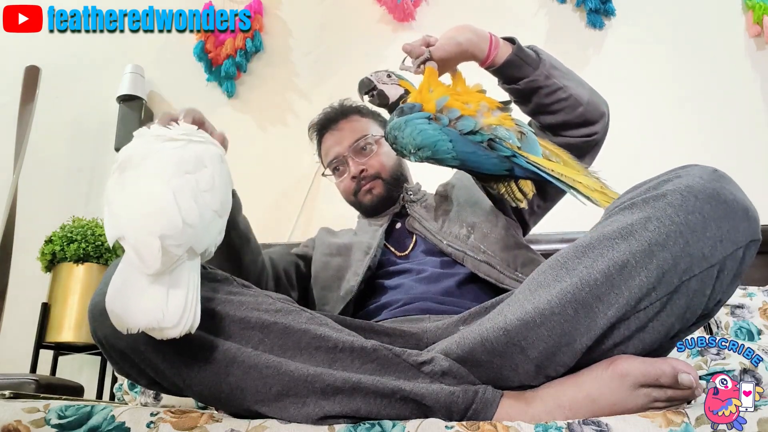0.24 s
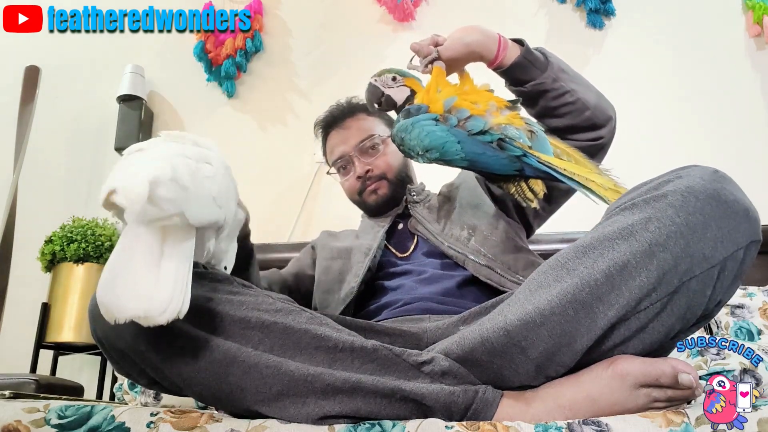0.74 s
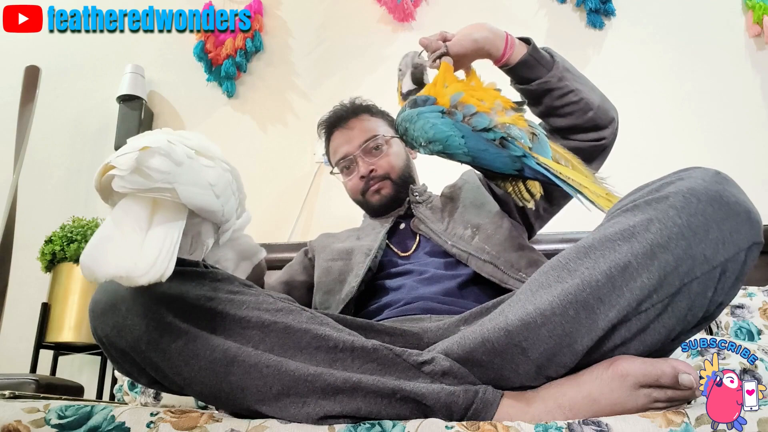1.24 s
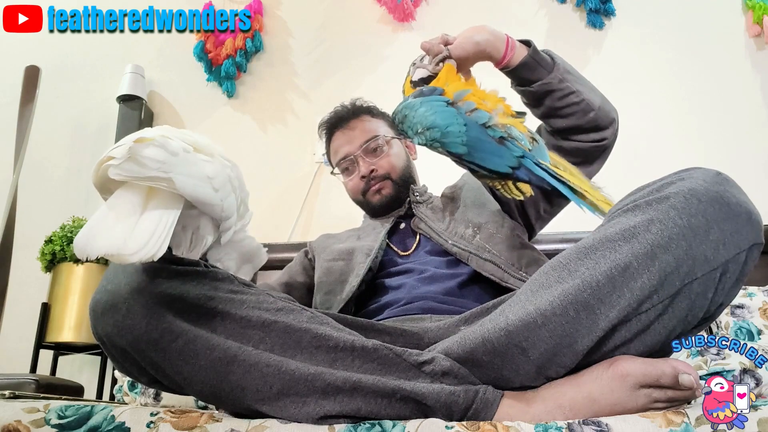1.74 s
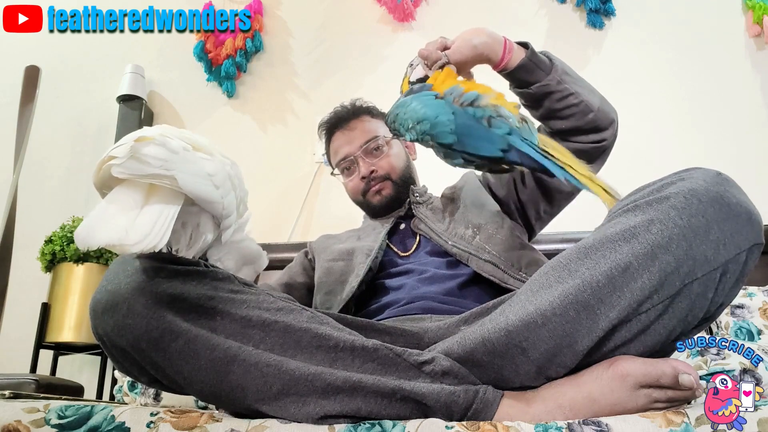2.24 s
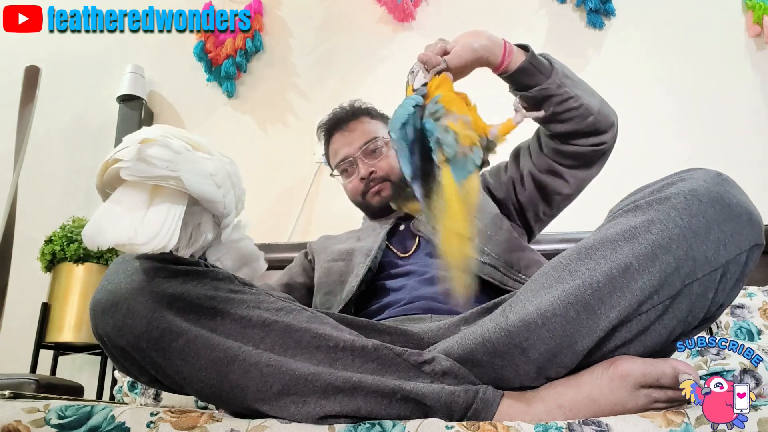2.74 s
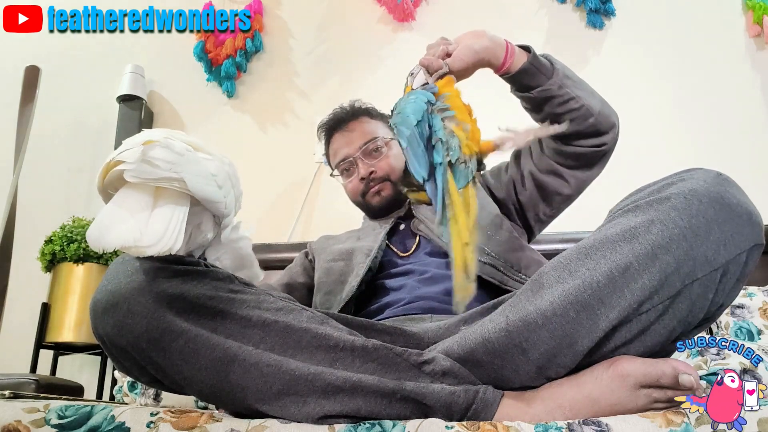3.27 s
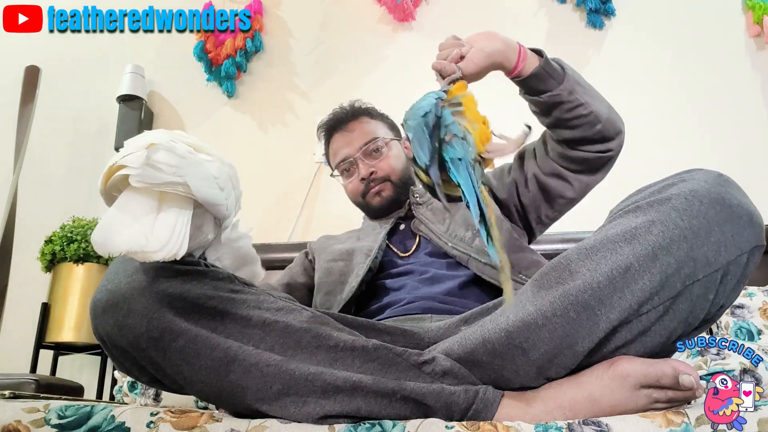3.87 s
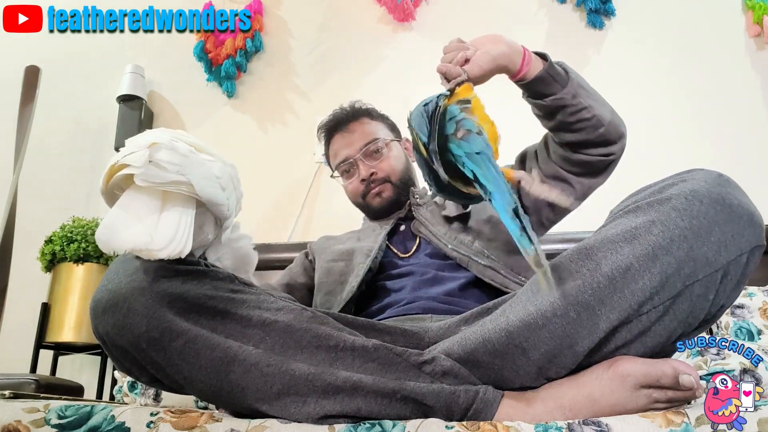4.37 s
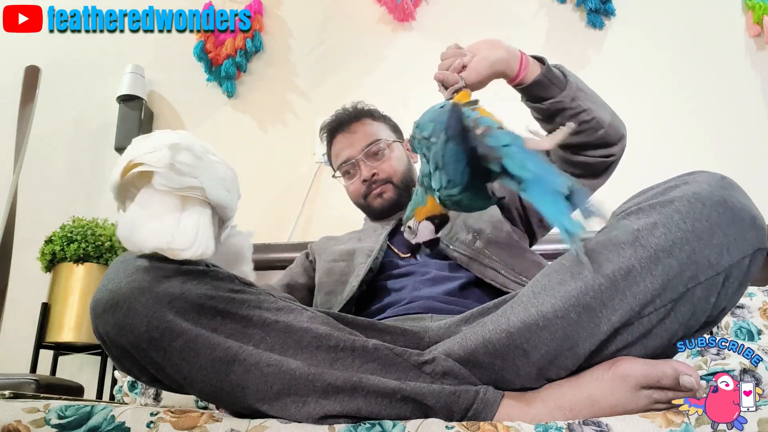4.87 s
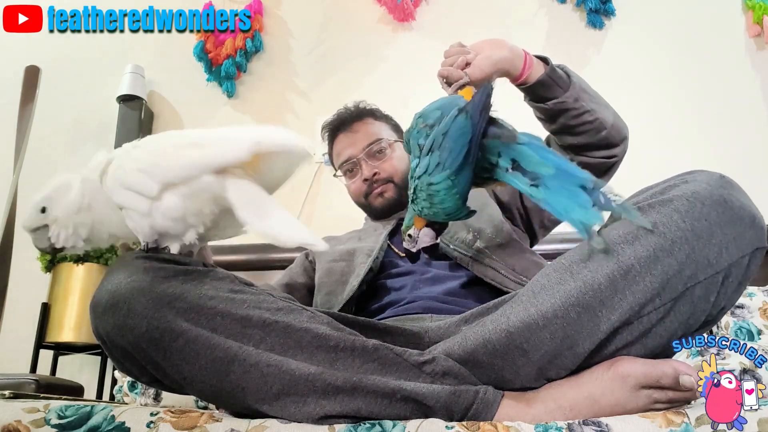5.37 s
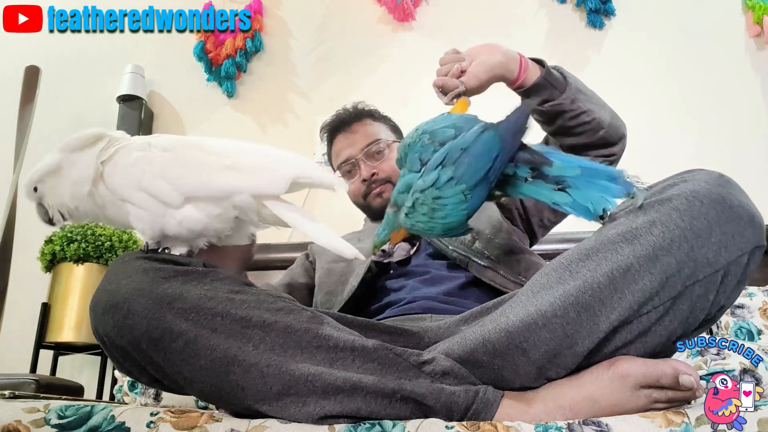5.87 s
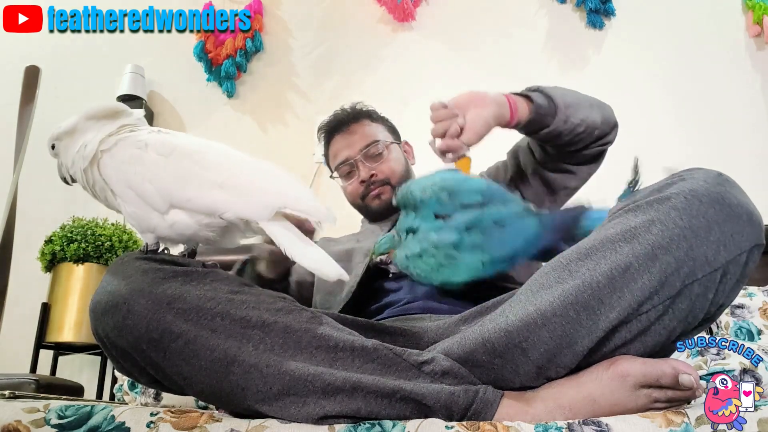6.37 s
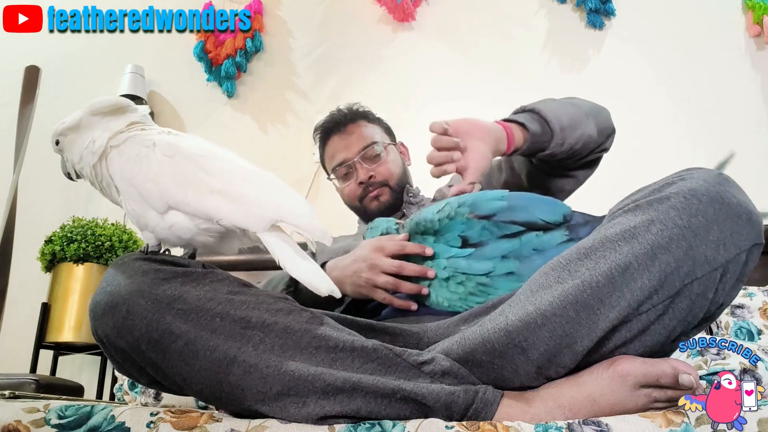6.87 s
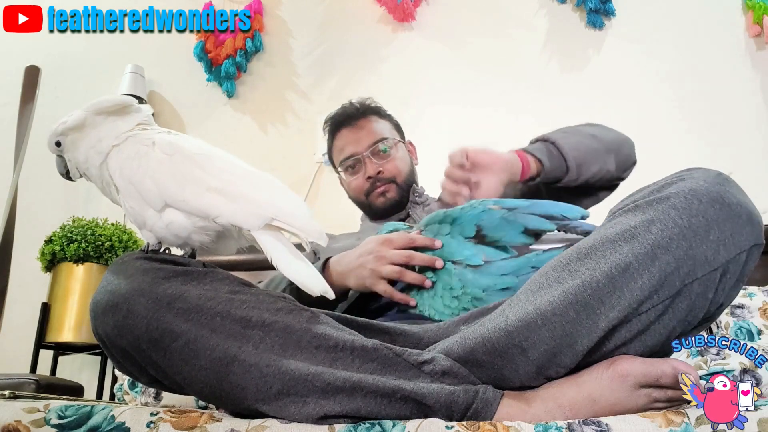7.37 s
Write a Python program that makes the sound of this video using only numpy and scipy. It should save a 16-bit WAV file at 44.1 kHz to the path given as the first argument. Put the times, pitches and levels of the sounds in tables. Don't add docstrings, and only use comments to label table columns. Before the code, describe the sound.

Pet parrots in an echoing bedroom give scattered squeaks, screeches and low growls, then one loud rising scream, and later three quick hoarse barks.

```python
import sys
import numpy as np
from scipy import signal
from scipy.fft import rfft, irfft, next_fast_len
from scipy.io import wavfile
from scipy.ndimage import uniform_filter1d, minimum_filter1d

SR = 44100
rng = np.random.default_rng(int(sys.argv[2]) if len(sys.argv) > 2 else 0)


def invert_db(x):
    u = np.asarray(x, float) / 20
    return 10 ** u


def output_pcm(signal):
    pcm = np.clip(np.atleast_2d(signal).T, -1, 1) * 32767
    wavfile.write(sys.argv[1], SR, np.round(pcm).astype(np.int16))


N = 335601

# start in seconds, length in seconds, pitch in Hz, level in dB.
WHISTLES = [(0.0, 0.18, 4625, -37.5), (.655, 0.043, 3706, -37.5), (1.114, 0.033, 3760, -50),
            (1.26, 0.18, 2995, -49), (1.555, 0.051, 3298, -31), (2.44, 0.091, 3540, -30),
            (2.5, 0.12, 3333, -32), (3.4, 0.065, 3560, -36), (3.62, .13, 3580, -38),
            (4.52, 0.079, 2479, -10.5), (5.44, 0.066, 1664, -58), (5.45, 0.042, 3400, -48),
            (6.64, 0.21, 5820, -40.5), (7.15, 0.039, 2610, -48.5), (7.21, 0.11, 3094, -48)]
# start in seconds, length in seconds, pitch in Hz, level in dB.
PEEPS = [(.178, 0.036, 2838, -29.5), (.48, 0.19, 1634, -54), (.535, 0.074, 1883, -48.5),
         (1.096, 0.031, 4384, -44.5), (2.228, 0.3, 2603, -42), (2.335, 0.041, 3066, -37),
         (2.753, 0.035, 1605, -38), (4.372, 0.067, 1672, -23), (5.305, 0.15, 8900, -41),
         (6.5, 0.12, 3180, -52.5), (6.575, .1, 2867, -33), (7.245, 0.071, 1674, -40.5)]
# start in seconds, length in seconds, pitch in Hz, level in dB.
SCREECHES = [(.19, 0.068, 3894, -33.5), (.832, 0.046, 3374, -42), (1.325, .14, 3274, -37),
             (1.44, 0.29, 3770, -40.5), (1.46, 0.065, 2838, -34), (1.584, .14, 2550, -35),
             (1.72, 0.061, 2442, -27), (1.865, 0.072, 2496, -25.5), (1.865, 0.049, 4280, -31.5),
             (1.96, 0.057, 2627, -30), (2.04, 0.046, 3203, -28.5), (2.15, 0.091, 1704, -42.5),
             (2.571, 0.066, 2788, -37.5), (3.325, 0.099, 2357, -35), (3.552, 0.083, 2590, -24),
             (3.92, 0.096, 2540, -28.5), (3.945, 0.085, 2842, -25), (4.09, 0.15, 2623, -26.5),
             (5.309, 0.055, 4550, -41), (5.39, .07, 4420, -46), (6.052, 0.037, 7600, -38),
             (5.4, 0.086, 6580, -48), (6.565, 0.047, 2570, -36), (6.64, .13, 4150, -35.5)]
# start in seconds, length in seconds, pitch in Hz, level in dB.
RASPS = [(0.0, 0.012, 2790, -16), (.066, 0.032, 4206, -28), (.07, 0.058, 3014, -35),
         (.18, 0.055, 3050, -41), (.625, 0.066, 4255, -43), (1.692, 0.048, 3030, -25),
         (1.74, .25, 1093, -47), (2.15, 0.014, 8200, -18.5), (2.85, 0.048, 7100, -58),
         (3.115, 0.048, 3810, -61.5), (4.0, .27, 1103, -47), (5.9, 0.021, 7650, -42.5),
         (4.2, 0.2, 2313, -32), (5.335, 0.11, 2350, -43), (6.555, 0.082, 7410, -36.5),
         (6.62, .06, 1227, -27.5), (6.95, 0.028, 7210, -26.5), (7.56, 0.054, 3460, -60)]
# start in seconds, length in seconds, pitch in Hz, level in dB.
WHEEZES = [
    (.66, 0.068, 2210, -53),
    (1.14, 0.069, 2674, -53),
    (1.185, 0.067, 1833, -53),
    (2.6, 0.084, 5260, -46),
    (3.552, .071, 4950, -36),
    (5.153, 0.26, 3510, -57),
    (6.37, 0.085, 3440, -51),
]
# start in seconds, length in seconds, pitch in Hz, level in dB.
HUFFS = [
    (3.18, 0.57, 1096, -57),
    (3.35, 0.16, 4147, -35),
    (3.89, .18, 4567, -32),
    (4.06, .26, 4624, -29.5),
    (5.33, .13, 4550, -46.5),
    (6.313, 0.019, 2670, -38.5),
    (1.75, 0.24, 3490, -36),
]
# start in seconds, pulses per second, level in dB, first and last resonance in Hz.
GROWLS = [
    (0.617, 51.4, -27.5, 1108, 1102),
    (0.638, 74, -41, 801, 795),
    (2.589, 65, -26.5, 759, 1076),
    (2.702, 46, -35.5, 358.2, 312),
]
# start in seconds, first and last pitch in Hz, level in dB, mouth resonance in Hz.
HONKS = [
    (2.85, 552.3, 572.5, -36.5, 1040),
    (5.872, 533, 510.4, -38, 1035),
    (6.052, 600, 527.6, -26.5, 980),
]
# start in seconds, first and last pitch in Hz, level in dB, mouth resonance in Hz.
SCREAM = [
    (4.364, 477.3, 632.4, -9.5, 2440),
]
# start in seconds, first and last pitch in Hz, level in dB, mouth resonance in Hz.
BARKS = [
    (6.621, 818.4, 704, -24, 1620),
    (6.782, 662, 584.3, -14, 1692),
    (6.953, 810, 668, -18.5, 1160),
]
# frequency in Hz, level in dB.
HONK_THROAT = [(500, 5.5), (1100, 17.5), (1650, -0.5), (2200, -9), (2700, 1.5), (3300, -7.5), (3800, -12),
               (5000, -23.5), (6000, -53), (7500, -72), (9000, 10.5), (11000, -52), (14000, -26)]
SCREAM_THROAT = [(500, -21), (1100, -7), (1450, -10), (1800, -10), (2900, -10), (3500, -11), (4500, -18.5),
                 (7500, -16), (11000, -29), (15000, -23.5)]
BARK_THROAT = [(600, -22), (1200, -3.5), (2100, -20.5), (2900, -18.5), (4000, -38.5), (5000, -45),
               (5800, -44), (7500, -32.5), (9000, -22.5), (11000, -41), (14000, -28.5)]
QUICK_DROP = [(0, 0), (.3, .7), (1, 1)]
LATE_RISE = [(0, 0.015), (.35, 0.018), (.53, .6), (.85, .92), (1, 0.81)]
# frequency in Hz, density in dB per Hz.
HUM = [(12, -23), (20, 8), (146, -12.5), (305, -1.5), (541, -9), (1160, -2.5), (1410, -11.5), (3360, -17),
       (5200, -50.5), (6000, -37.5), (6830, -46), (8270, -21.5), (9730, -58), (13500, -30)]
# time in seconds, rustle in dB.
STIR = [(0.0, -59.5), (1.3, -61.5), (1.7, -60), (2.54, -48.5), (2.79, -44.5), (2.98, -65), (3.24, -50.5),
        (3.45, -47.5), (4.09, -56), (5.19, -63.5), (6.88, -57), (7.6, -63)]
# frequency in Hz, left-right likeness from 0 to 1.
LIKENESS = [(30, 0.9), (200, 0.94), (400, 0.68), (800, 0.032), (1500, .0), (15000, 0.94)]
# from seconds, lead of the left port in samples (negative: right leads), left-
# right difference in dB.
BEARING = [
    (0, -20.5, 1),
    (.45, 20.5, 1),
    (1.0, 26, 1),
    (2.55, 23.5, 5),
    (3.3, 25, 1.5),
    (3.9, -4.5, -1.5),
    (5.1, 26, 1.5),
    (6.03, -18, 7),
    (6.3, 25, 2.5),
]
# frequency in Hz, time to fall 60 dB in seconds.
ROOM_T60 = [(300, 0.56), (1000, 0.55), (2500, 0.62), (5000, 0.56), (8000, 0.46), (13000, 0.49)]
# frequency in Hz, gain in dB.
MICROPHONE = [(50, -2.5), (4500, 2.5), (5300, -1), (6050, -8), (7300, -2.5), (8600, -4), (9600, -13.5),
              (10700, -7), (12000, -11), (12900, -3), (14500, -10.5), (16000, -25)]
# frequency in Hz, threshold in spreads of chance.
STARVED = [(5000, -3), (6500, -1.4), (9000, -.6), (12000, -.1), (15500, .2)]


def at_hz(points, hz):
    table_hz, values = np.array(points).T
    return np.interp(np.log(np.maximum(hz, 1)), np.log(table_hz), values)


def rms_one(x):
    return x / np.sqrt(np.mean(x ** 2) + 1e-20)


def band_pass(x, order, band_hz):
    return signal.sosfilt(signal.butter(order, band_hz, "band", fs=SR, output="sos"), x)


def wander(rate_hz):
    r = np.exp(-2 * np.pi * rate_hz / SR)
    return rms_one(signal.lfilter([1], [1, -2 * r, r * r], rng.standard_normal(N)))


def coloured(x, points):
    length = x.shape[-1]
    size = next_fast_len(length)
    gain = invert_db(at_hz(points, np.fft.rfftfreq(size, 1 / SR)))
    return irfft(rfft(x, size) * gain, size)[..., :length]


def diffuse(size):
    mid, side = rfft(rng.standard_normal((2, size)))
    alike = np.clip(at_hz(LIKENESS, np.fft.rfftfreq(size, 1 / SR)), -1, 1)
    ports = np.sqrt(1 + alike) * mid + np.sqrt(1 - alike) * side * [[1], [-1]]
    return irfft(ports, size) / np.sqrt(2)


def breath_span(start, length, attack, release):
    at = np.arange(round(start * SR), min(round((start + length) * SR), N))
    t = (at - at[0]) / SR
    rise = np.clip(t / attack, 0, 1)
    fall = np.clip((length - t) / release, 0, 1)
    return at, t / length, np.sin(np.pi / 2 * rise * fall) ** 2


def shrill():
    kinds = [(WHISTLES, 0.0251, -15), (PEEPS, 0.022, -3.5), (SCREECHES, 0.0487, -5.5),
             (RASPS, 0.095, -2.5), (WHEEZES, 0.0862, -15), (HUFFS, 0.2, -8.5)]
    sag_share = 0.0307
    out, flutter, throb = np.zeros(N), wander(195.5), wander(177)
    air = rng.standard_normal(N)
    stray = wander(14.05)
    air = rms_one(band_pass(air, 2, [1800, 9000]))
    notes = [(*note, scatter, step_db) for kind, scatter, step_db in kinds for note in kind]
    for k, (start, length, hz, level_db, scatter, step_db) in enumerate(notes):
        at, progress, envelope = breath_span(start, length, 0.004 + 0.12 * length, 0.016)
        own = (at + 7919 * k) % N
        unsteady = flutter[own] + 0.4 * stray[own]
        unsteady = unsteady - unsteady.mean()
        pitch = hz * (1 + scatter * unsteady + sag_share * (0.5 - progress))
        phase = 2 * np.pi * np.cumsum(pitch) / SR
        tone = sum(invert_db(step_db * (n - 1)) * np.sin(n * phase) for n in range(1, 7) if n * hz < 15500)
        hiss = invert_db(-15.5) * air[own] * np.sqrt(scatter / 0.039) * (hz < 6000)
        effort_db = level_db + 1.3 * throb[own] + 3.18 * stray[at]
        out[at] += invert_db(effort_db) * envelope * (np.sqrt(2) * tone + hiss)
    return out


def background():
    size = next_fast_len(N)
    out = invert_db(-54.5) * rms_one(coloured(diffuse(size), HUM))[:, :N]
    stir = diffuse(size)
    s, rustle_db = np.transpose(STIR)
    rumble_db = -60.5 + 0.54 * (rustle_db - rustle_db.mean())
    for level_db, band_hz in ((rustle_db, [170, 450]), (rumble_db, [35, 110])):
        low = band_pass(stir, 3, band_hz)[:, :N]
        out = out + invert_db(np.interp(np.arange(N) / SR, s, level_db)) * rms_one(low)
    return out


def growls():
    out, uneven, flutter = np.zeros(N), wander(38.2), wander(60)
    for start, per_s, level_db, first_hz, last_hz in GROWLS:
        at, progress, envelope = breath_span(start, 0.1804, 0.013, 0.12)
        slaps = np.cumsum(per_s * (1 + 0.298 * uneven[at]).clip(0.3) / SR)
        since_slap = slaps % 1 / per_s
        hz = first_hz + (last_hz - first_hz) * np.sqrt(progress)
        hz = hz * (1 + 0.086 * flutter[at])
        ring = np.sin(2 * np.pi * np.cumsum(hz) / SR)
        ring = ring * since_slap ** 2 * np.exp(-since_slap / 0.0019)
        out[at] += invert_db(level_db) * envelope * rms_one(ring)
    return out


def honks(calls, length, throat, wobble, hoarse, mouth_width, attack, glide):
    out, flutter, turbulence = np.zeros(N), wander(107), wander(120)
    orders = np.arange(1, 34)[:, None]
    loudest_db = np.max(np.transpose(calls)[3])
    for start, first_hz, last_hz, level_db, mouth_hz in calls:
        at, progress, envelope = breath_span(start, length, attack, 0.018)
        travel = np.interp(progress, *np.transpose(glide))
        pitch = (first_hz + (last_hz - first_hz) * travel) * (1 + wobble * flutter[at])
        phase = 2 * np.pi * np.cumsum(pitch) / SR
        hz = orders * pitch
        effort = 0.4 * (level_db - loudest_db)
        mouth = 1 / (1 + ((hz - mouth_hz) / (mouth_width * mouth_hz)) ** 2)
        throat_db = at_hz(throat, hz) + effort * np.log2(hz / mouth_hz).clip(0, 2)
        overtones = (invert_db(throat_db) + mouth) * np.sin(orders * phase) * (hz < 16000)
        stack = np.sum(overtones, axis=0)
        out[at] += invert_db(level_db) * envelope * rms_one(stack * (1 + hoarse * turbulence[at]))
    return out


def two_ports(x):
    s, delay, pan_db = np.transpose(BEARING)
    now = np.arange(N)
    place = np.searchsorted(s * SR, now, "right") - 1
    sides = np.array([[1], [-1]])
    arrival = now - 12 + sides * delay[place] / 2
    return np.interp(arrival, now, x) * invert_db(sides * pan_db[place] / 2)


def bedroom(x):
    size = SR
    t, field, tail = np.arange(size) / SR, diffuse(size), 0
    edges = 150 * 2 ** np.arange(0, 7.1, 0.5)
    for low, high in zip(edges, edges[1:]):
        band = band_pass(field, 2, [low, high])
        tail = tail + band * invert_db(-60 * t / at_hz(ROOM_T60, np.sqrt(low * high)))
    tail = tail * np.clip((t - 0.003) / 0.0037, 0, 1)
    tail = tail / np.sqrt(np.sum(tail ** 2) / 2)
    return signal.fftconvolve(x[None], tail, axes=1)[:, :N]


def scene():
    soft = honks(HONKS, 0.078, HONK_THROAT, wobble=0.012, hoarse=0.13, mouth_width=0.05,
                 attack=0.008, glide=QUICK_DROP)
    barks = honks(BARKS, 0.0544, BARK_THROAT, wobble=0.04, hoarse=0.38, mouth_width=0.06,
                  attack=0.0026, glide=QUICK_DROP)
    scream = honks(SCREAM, 0.22, SCREAM_THROAT, wobble=0.017, hoarse=0.38, mouth_width=0.07,
                   attack=0.05, glide=LATE_RISE)
    birds = shrill() + growls() + soft + barks + scream
    birds = signal.sosfilt(signal.butter(4, 230, "high", fs=SR, output="sos"), birds)
    heard = invert_db(-2.5) * two_ports(birds) + invert_db(2.5) * bedroom(birds)
    return coloured(heard, MICROPHONE) + background()


def limiter(x, ceiling):
    gain = np.minimum(1, ceiling / (np.abs(x).max(axis=0) + 1e-9))
    return x * uniform_filter1d(minimum_filter1d(gain, size=441), size=441)


def drop_masked(x, below_db, spread_db_per_khz, from_hz, chance_db):
    hz, t, cells = signal.stft(x, SR, nperseg=2048, noverlap=1024)
    bands = cells[:, :1024].reshape(2, 128, 8, -1)
    centre_hz = hz[4:1024:8]
    level_db = 10 * np.log10(np.mean(np.abs(bands) ** 2, axis=(0, 2)) + 1e-20)
    apart_khz = np.abs(centre_hz[:, None] - centre_hz) / 1000
    spread_db = level_db[None] - spread_db_per_khz * apart_khz[..., None]
    mask_db = np.max(spread_db[:, centre_hz > 1500], axis=1) - below_db
    lingering = rms_one(uniform_filter1d(rng.standard_normal(level_db.shape), size=4, axis=1))
    keep = np.clip((level_db - mask_db + chance_db * lingering) / 3.6, 0, 1)
    lottery = rms_one(uniform_filter1d(rng.standard_normal((64, len(t))), size=2, axis=1))
    keep *= np.repeat(lottery, 2, axis=0) > at_hz(STARVED, centre_hz)[:, None]
    keep[centre_hz < from_hz] = 1
    cells[:, :1024] *= np.repeat(keep, 8, axis=0)
    return signal.istft(cells, SR, nperseg=2048, noverlap=1024)[1][:, :N]


def top_cut(x):
    return signal.sosfilt(signal.butter(12, 15960, fs=SR, output="sos"), x)


def record(dry):
    held = limiter(dry, ceiling=0.9)
    thinned = drop_masked(held, below_db=26.5, spread_db_per_khz=2.5, from_hz=3600, chance_db=8.5)
    return top_cut(thinned)


dry = scene()
out = record(dry)
output_pcm(out)
```